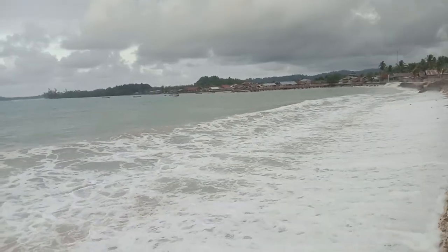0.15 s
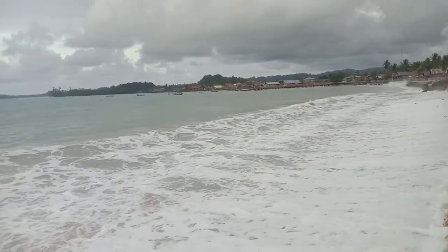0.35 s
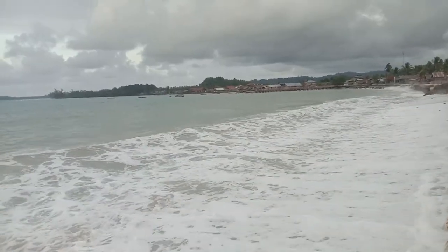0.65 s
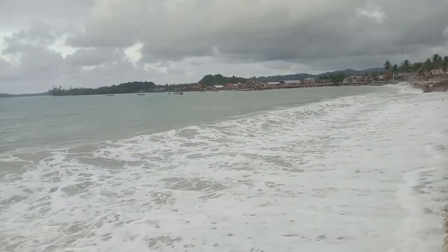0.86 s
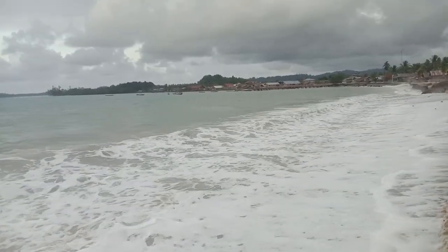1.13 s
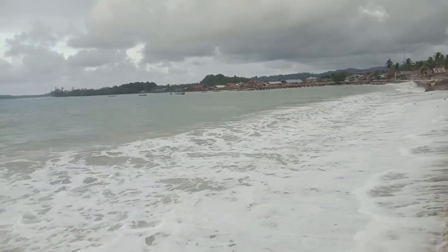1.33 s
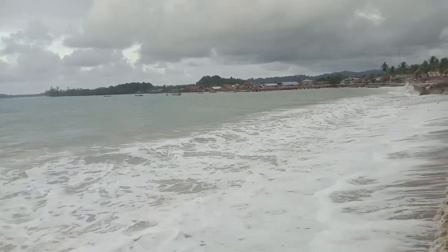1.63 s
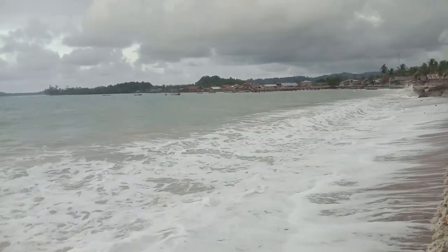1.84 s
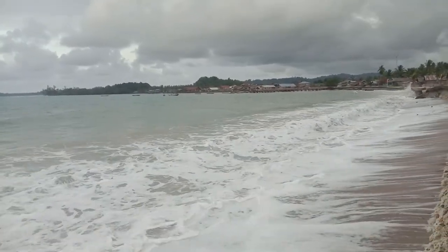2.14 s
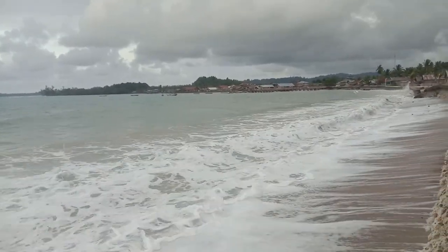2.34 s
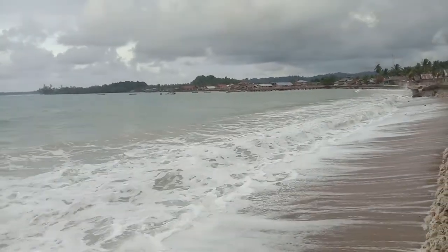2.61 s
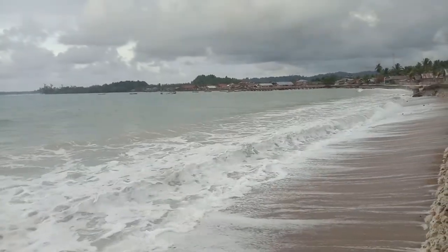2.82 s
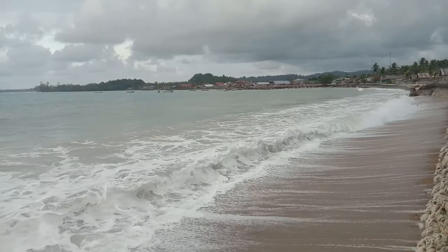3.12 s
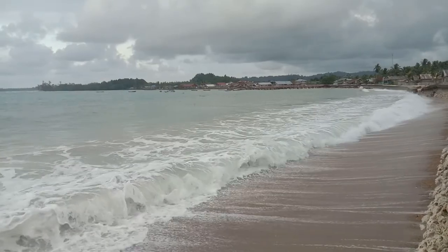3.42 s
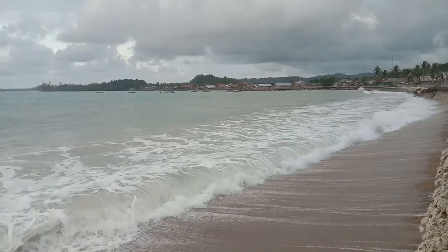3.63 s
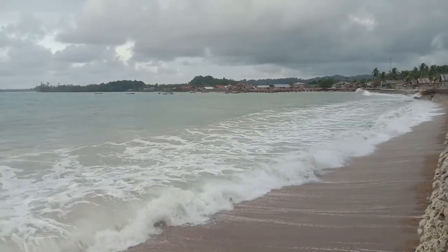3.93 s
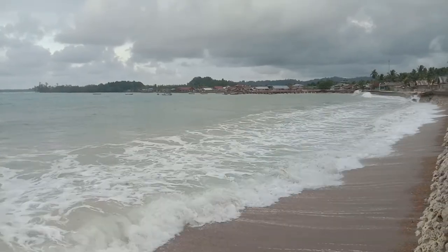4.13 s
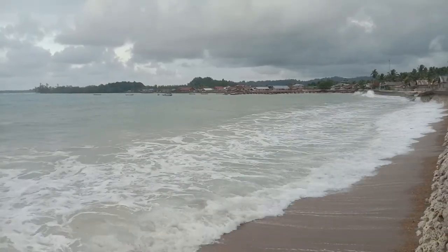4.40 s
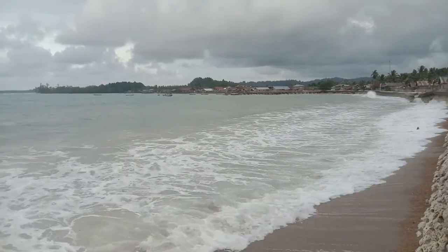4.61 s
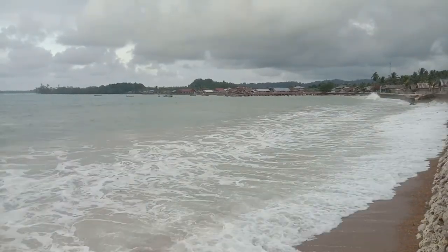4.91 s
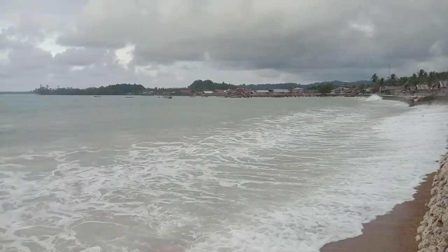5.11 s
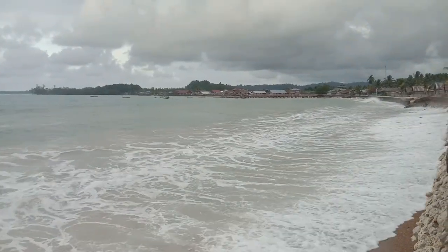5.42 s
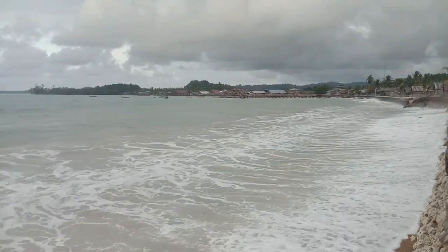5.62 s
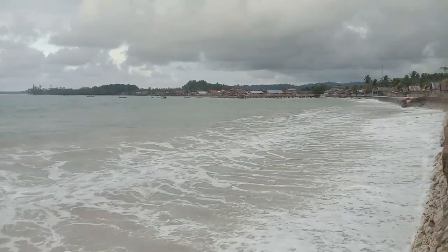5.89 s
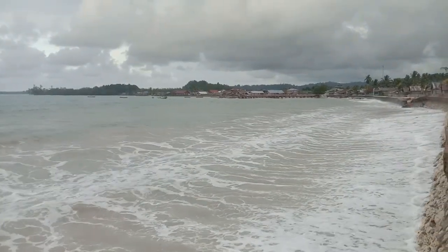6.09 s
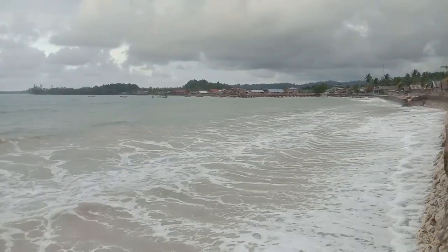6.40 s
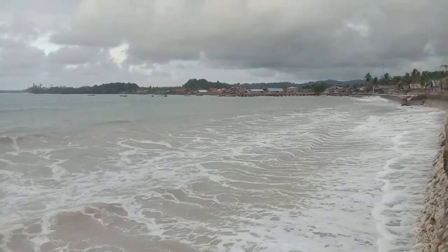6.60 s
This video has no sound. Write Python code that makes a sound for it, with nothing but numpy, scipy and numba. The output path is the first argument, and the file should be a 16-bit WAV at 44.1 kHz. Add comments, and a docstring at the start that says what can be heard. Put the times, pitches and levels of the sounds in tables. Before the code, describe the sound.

On an open sandy beach, an earlier wave dies away under strong, fluttering wind rumble and sharp thumps on a small microphone. Gusts thin out while water drains hissing down the sand. Around four seconds a wave topples with splashes and a full roar, runs up as bright foam, then fades, followed by a weaker wash.

```python
"""Surf on a sandy beach, heard by one small microphone in a gusty wind.
First an earlier wave dies away while strong gusts rumble; then water drains back over the sand until about 3 s.
Near 4 s the main wave breaks with splashes and runs up as hissing foam; two weaker ones follow after 6 s.
The sea is noise and random bubble bursts in four pitch bands; the wind is noise through a moving low-pass.
A limiter turns everything down when the sound is loud, so the strongest gusts also duck the sea."""
import sys
import numpy as np
from scipy.fft import rfft, irfft
from scipy.io import wavfile
from scipy.ndimage import uniform_filter1d, minimum_filter1d
from numba import njit

SR = 44100
rng = np.random.default_rng(int(sys.argv[2]) if len(sys.argv) > 2 else 0)


def wav_record(signal):
    """Record a signal, one row per channel, as 16-bit PCM in the file named by sys.argv[1]."""
    frames = np.transpose(np.atleast_2d(signal))
    bounded = np.clip(frames, -1, 1)
    # unit amplitude maps onto the largest positive 16-bit level
    quanta = np.round(bounded * 32767).astype(np.int16)
    wavfile.write(sys.argv[1], SR, quanta)


N = 297675

# waves, one per row; a negative time means it broke before the start:
# (break time [s], level [dB], duration [times a full wave], treble tilt [dB per octave above the roar])
WAVES = [(-1.44, -7.5, 1.2, 1.3), (4.0, 0, 1, 0), (6, -22.5, .28, -9), (6.5, -10, .42, -1.5)]
# stages of a full wave, in rows: roar of tumbling water, wash up the beach, hiss of foam, fizz on the sand:
# (delay after the break [s], rise [dB/s], hold [s], fall [dB/s], peak [dB], steady surf of the shore [dB])
WAVE_STAGES = [(-0.033, 20.5, 0.62, 27, -23.5, -44.5), (0.32, 21, 0.39, 14.5, -29.2, -47),
               (-0.029, 11.5, 0.53, 13, -35.5, -52.5), (-.15, 6, 0.73, 7.5, -41, -50)]
# bubble sounds of roar, wash, foam and fizz:
# (centre [Hz], spread [octaves], surging [dB], bursts [per s], share of power in bursts [0-1])
BUBBLES = [(303, 1.16, 1, 1500, 0.2), (1470, 0.8, 0, 3000, 0.25), (4600, 0.78, 2.5, 3000, 0.43),
           (9400, 0.56, 0, 1600, 0.03)]
# water draining back down the sand, one level each for roar, wash, foam and fizz: (level [dB])
BACKWASH_DB = [-38, -60, -45, -39.5]
# crests that topple over and splash: (time [s], half length [s], extra level of the sea [dB])
SPLASHES = [(3.46, 0.047, 1.5), (3.87, 0.076, 2), (4.05, 0.039, 2), (4.66, 0.064, 0)]
# gusts on the microphone port; higher fineness means smaller eddies and a brighter rumble:
# (start [s], hold [s], strength [dB], fineness [octaves added to the rumble's corner])
GUSTS = [(0, 0.017, -25, 0.22), (0.131, .04, -21.5, -.1), (0.172, 0.053, -4.5, -0.52),
         (0.236, 0.18, -2, 0.16), (0.434, 0.043, -4.5, -0.52), (0.492, 0.053, -12.5, 0.17),
         (0.693, 0.052, -24.5, -0.1), (0.818, 0.25, -20, 0), (1.102, 0.19, -17, 0.13),
         (1.305, 0.028, 2, 0.25), (1.361, 0.064, -6.5, -0.16), (1.482, 0.046, -0.5, 0.02),
         (1.578, 0.096, -12, -0.27), (1.753, 0.013, -11.5, -0.34), (1.91, 0.29, -34, -.1),
         (2.385, 0.34, -27, -0.15), (2.496, 0.036, -20, -0.1), (2.814, 0.15, -25.5, 0.4),
         (3.038, .32, -13.5, -0.18), (3.079, 0.053, -7.5, -0.25), (3.386, 0.36, -18, 0.3),
         (3.506, 0.058, -10.5, -0.02), (3.772, 0.65, -26.5, 0.04), (5.096, 0.067, -24, -0.2),
         (5.268, .06, -18.5, -0.4), (5.41, 0.06, -23, -0.53), (5.507, 0.039, -23, -0.9),
         (5.63, 0.012, -30.5, -.45), (5.781, 0.011, -24.5, -0.04), (6.283, .15, -30, -0.34),
         (6.55, 0.057, -19, -0.56), (6.686, 0.076, -20, -0.6)]
# sharp eddies that hit the port: (time [s], half length [s], extra eddy strength [dB])
BUFFETS = [(0.174, 0.0035, 7), (0.213, 0.0045, 8.5), (0.311, .003, 0), (0.364, 0.0026, 8),
           (.985, 0.0054, 8.5), (1.1, 0.0075, 7), (1.233, 0.0045, 13.5), (1.284, 0.005, 4),
           (1.368, 0.0099, 10), (1.509, 0.0075, 14.5), (1.559, 0.0045, 16.5), (1.635, 0.011, 11.5),
           (3.084, 0.01, 12), (3.374, 0.0089, 12), (3.626, 0.0085, 8.5), (5.156, 0.0038, 18)]
# colour of the microphone behind its port: (frequency [Hz], gain [dB])
MIC_COLOUR = [(100, 0.48), (1000, -2.5), (2200, 5.5), (2800, 0.7), (3450, -5), (4200, 10.5), (5800, 12),
              (6550, 7), (7450, 17.5), (8200, 6), (9500, -1.3), (11300, -10.5), (13900, -9.5), (14700, 3.5)]

# the backwash gathers speed until the next wave covers it
BACKWASH_S, BACKWASH_RISE_DB_PER_S, BACKWASH_HOLD_S, BACKWASH_FALL_DB_PER_S = 2.82, 6, 0.32, 10
GUST_ATTACK_S, GUST_RELEASE_S = 0.016, 0.028
BREEZE_DB, BREEZE_WANDER_DB, BREEZE_RATE = -34, 2, 15  # light air between gusts; changes per s
PORT_HZ, PORT_WIDTH_HZ, PORT_LIFT = 1243, 51, 2.21  # ring of the housing; lift is a plain gain
TOP_HZ = 15550  # nothing much is heard above this
TIME = np.arange(N) / SR  # seconds
FREQS = np.maximum(np.arange(N // 2 + 1) * SR / N, 1)  # Hz, kept above zero


def sea(bass_cut_hz=65):
    """The breaker roars with large bubbles; wash, foam and fizz ring with ever smaller ones."""
    rush = 0
    for stage, backwash_db, bubbles in zip(WAVE_STAGES, BACKWASH_DB, BUBBLES):
        level = stage_level(stage, backwash_db, bubbles[0])
        rush = rush + level * bubble_cloud(*bubbles)
    bass_cut = (1 + (bass_cut_hz / FREQS) ** 6) ** -0.5
    return shaped(rush, bass_cut) * undb(swells(SPLASHES))


def stage_level(stage, backwash_db, hz):
    """Level of one stage: steady surf, backwash and each wave add up in power."""
    delay_s, rise, hold_s, fall, peak_db, steady_db = stage
    backwash = envelope(TIME - BACKWASH_S, BACKWASH_RISE_DB_PER_S, BACKWASH_HOLD_S, BACKWASH_FALL_DB_PER_S)
    power = undb(steady_db) ** 2 + (undb(backwash_db) * backwash) ** 2
    octaves = np.log2(hz / BUBBLES[0][0])  # distance above the roar
    for break_s, db, duration, tilt_db in WAVES:
        # a short wave runs through the same stages faster
        age = (TIME - break_s) / duration - delay_s
        wave = undb(peak_db + db + tilt_db * octaves) * envelope(age, rise, hold_s, fall)
        power = power + wave ** 2
    return np.sqrt(power)


def bubble_cloud(hz, octaves, surge_db, rate, share, size_db=5.5, surge_rate=14):
    """Countless bubbles merge into noise; nearer ones burst singly; three patches of water surge separately."""
    share = np.clip(share, 0, 1)
    cloud = 0
    for offset in (-0.5, 0, 0.5):
        sizes = undb(size_db * np.minimum(rng.exponential(size=N), 4))
        bursts = rng.choice([-1, 1], N) * sizes * (rng.random(N) < rate / SR)
        source = np.sqrt(1 - share) * rng.standard_normal(N) + np.sqrt(share) * unit(bursts)
        # a patch may favour the larger or the smaller bubbles
        distance = np.log2(FREQS / hz) / octaves
        band = np.exp(-(distance / 2) ** 2)
        response = band * np.sqrt(1 + 2 * offset * np.tanh(distance))
        cloud = cloud + shaped(source, response) * undb(surge_db * walk(surge_rate))
    return unit(cloud)


def wind(corner_hz=470, db_per_octave=18.0, calm_hz=170, damping=1.93, bass_hz=92, bass_damping=0.81,
         leak_hz=68, cavity_hz=1600, eddy_db=3.0, eddy_rate=110, push=0.52):
    """Turbulence on the port: faster air is louder and carries smaller eddies, so the rumble opens upward."""
    gust_db, fineness = airflow()
    eddies_db = eddy_db * walk(eddy_rate) + swells(BUFFETS)
    opening = fineness + (gust_db + eddies_db + 9) / db_per_octave  # octaves
    corner = np.clip(corner_hz * 2 ** opening, calm_hz, SR / 12)
    # the capsule leaks the slowest pressure swings; the cavity behind the port smooths the fastest
    bass = 1 / np.abs(1 - (bass_hz / FREQS) ** 2 + 1j * bass_damping * bass_hz / FREQS)
    port = bass / np.sqrt((1 + (leak_hz / FREQS) ** 4) * (1 + (FREQS / cavity_hz) ** 4))
    pressure = shaped(rng.standard_normal(N), port)
    rumble = lowpass(lowpass(pressure, corner, damping), corner, damping)
    # even out the slow level, so that a wider band is not louder by itself
    power = uniform_filter1d(uniform_filter1d(rumble ** 2, size=1300), size=700)
    # push is the part of the eddy strength that goes into loudness
    return rumble / np.sqrt(power) * undb(gust_db + push * eddies_db)


def airflow():
    """Gusts rise, hold and die over a light breeze; stronger ones weigh more in the fineness (dB, octaves)."""
    power = undb(BREEZE_DB + BREEZE_WANDER_DB * walk(BREEZE_RATE)) ** 2
    fineness = 0
    for start_s, hold_s, db, octaves in GUSTS:
        age = TIME - start_s
        before = -age / GUST_ATTACK_S
        after = (age - hold_s) / GUST_RELEASE_S
        fade = np.maximum(np.maximum(before, after), 0)
        gust = (undb(db) * np.exp(-np.minimum(fade, 20))) ** 2
        power = power + gust
        fineness = fineness + gust * octaves
    return 10 * np.log10(power), fineness / power


def scene():
    """Sea and wind add up at one microphone that feeds both channels."""
    return np.tile(sea() + wind(), (2, 1))


def microphone(x):
    """A broad uneven response and one narrow ring of the housing."""
    hz, db = np.transpose(MIC_COLOUR)
    colour = undb(np.interp(np.log(FREQS), np.log(hz), db))
    ring = 1 / (1 + 1j * (FREQS / PORT_HZ - PORT_HZ / FREQS) * PORT_HZ / PORT_WIDTH_HZ)
    return shaped(x, colour * (1 + PORT_LIFT * ring))


def limiter(x, ceiling_db=-10.5, attack_s=0.002, release_s=0.038, knee=5, split_hz=3900, treble_depth=0.71):
    """Loud moments pull the gain down, a little less in the treble, and it recovers as the peaks sink."""
    over = follower(x[0], attack_s, release_s) / undb(ceiling_db)
    gain = (1 + over ** knee) ** (-1 / knee)
    # turn down slightly early, then round off the steps
    gain = uniform_filter1d(minimum_filter1d(gain, size=89), size=89)
    low = shaped(x, 1 / (1 + (FREQS / split_hz) ** 20))
    treble = x - low
    return low * gain + treble * gain ** treble_depth


def record(dry):
    """Microphone colour, limiter and a steep cut of the top."""
    top_cut = np.clip((TOP_HZ - FREQS) / 100 + 0.5, 0, 1)
    return shaped(limiter(microphone(dry)), top_cut)


def undb(db):
    """Turn decibels into a plain gain."""
    return 10 ** (np.asarray(db) / 20)


def unit(x):
    """Scale to an average (rms) strength of 1."""
    return x / np.sqrt(np.mean(x ** 2))


def envelope(age, rise, hold, fall):
    """Gain that climbs to 1 at age 0, holds and sinks; rise and fall in dB per unit of age."""
    return undb(-rise * np.maximum(-age, 0) - fall * np.maximum(age - hold, 0))


def swells(table):
    """Brief rounded rises in dB from rows (time [s], half length [s], height [dB])."""
    return sum(db * np.exp(-((TIME - s) / half_s) ** 2) for s, half_s, db in table)


def shaped(x, response):
    """Filter by a gain for each frequency."""
    return irfft(rfft(x) * response, N)


def walk(rate):
    """Random levels, a new one every 1 / rate seconds, joined smoothly; rms 1."""
    hold = max(int(SR / rate), 2)
    steps = np.repeat(rng.standard_normal(N // hold + 1), hold)
    return unit(uniform_filter1d(uniform_filter1d(steps, hold), hold // 2)[:N])


@njit
def lowpass(x, hz, damping):
    """Low-pass filter with a corner that moves at every sample (state-variable type)."""
    y, band, low = np.empty(len(x)), 0., 0.
    for i in range(len(x)):
        g = np.tan(np.pi * hz[i] / SR)
        v = (band + g * (x[i] - low)) / (1 + g * (g + damping))
        y[i] = low + g * v
        band, low = 2 * v - band, 2 * y[i] - low
    return y


@njit
def follower(x, attack_s, release_s):
    """Follow the peaks: rise quickly and sink slowly."""
    y, level = np.empty(len(x)), 0.
    for i in range(len(x)):
        size = abs(x[i])
        level += (size - level) / (SR * (attack_s if size > level else release_s))
        y[i] = level
    return y


dry = scene()
out = record(dry)
wav_record(out)
```